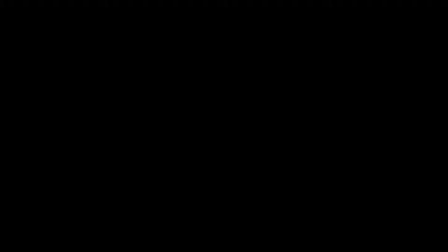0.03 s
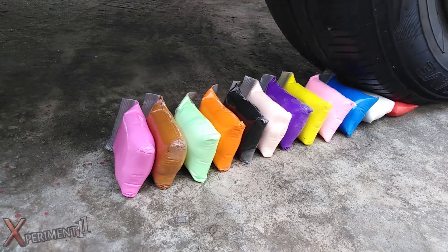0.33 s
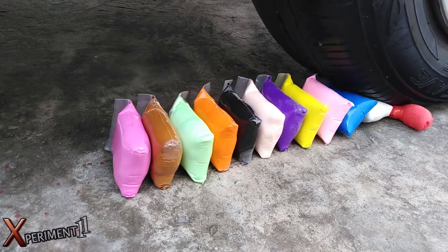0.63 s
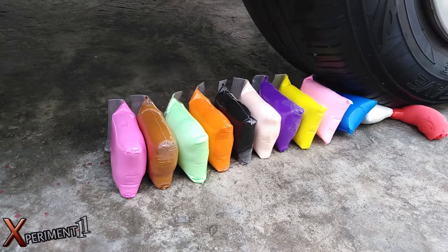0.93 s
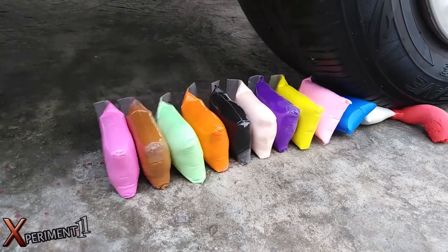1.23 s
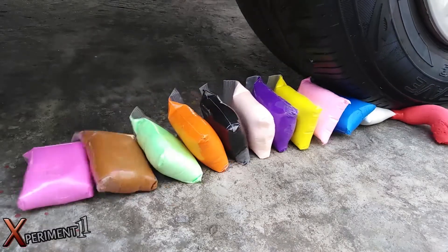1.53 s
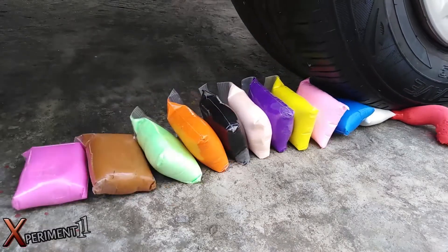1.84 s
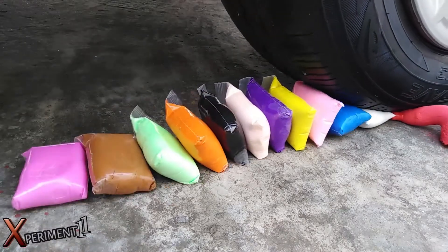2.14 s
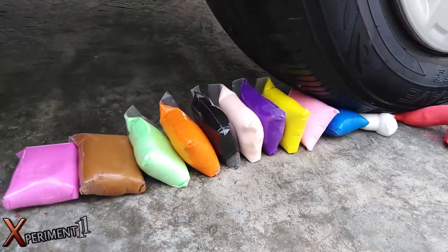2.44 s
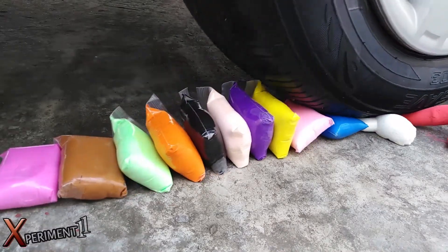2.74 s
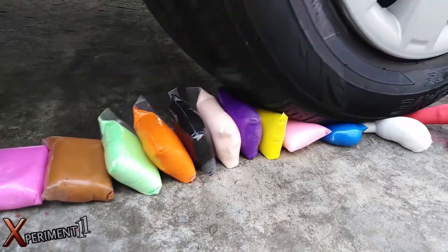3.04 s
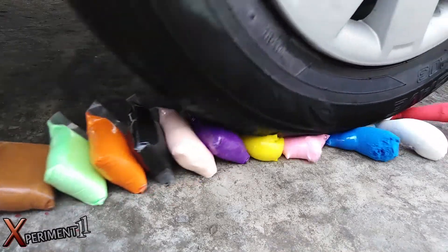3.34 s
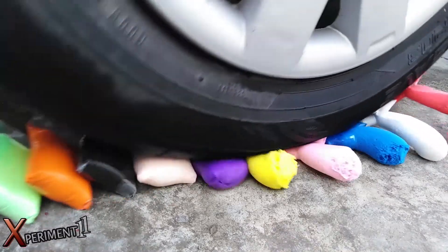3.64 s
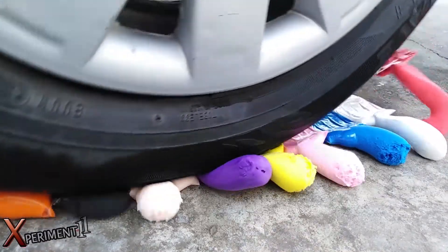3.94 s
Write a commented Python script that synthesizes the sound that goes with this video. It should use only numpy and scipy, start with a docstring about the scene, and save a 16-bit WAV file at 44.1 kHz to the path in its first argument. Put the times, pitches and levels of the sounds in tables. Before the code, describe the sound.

Plastic sachets burst with sharp cracks under a car tyre. Two single pops come as the engine revs up twice, then a quick, loud run of bursts follows, with rumble and grit crackling on concrete close to the microphone.

```python
"""A short scrape over an idling engine, then a rev and a sharp crack: a car is creeping over a row of
paste-filled plastic sachets on concrete. Each sachet bursts and rattles between ground and wheel arch,
the loudest cracks overloading the microphone. The engine is revved up and let down twice; it throbs and
hisses, growing louder as the wheel comes close and grit crackles under the tread. Faint, thin tones
flicker and fade in the quiet stretches, and the level dips briefly before the last run of bursts."""
import sys
import numpy as np
from scipy import signal
from scipy.fft import rfft, irfft
from scipy.io import wavfile

SR = 44100
rng = np.random.default_rng(int(sys.argv[2]) if len(sys.argv) > 2 else 0)


def file_out(sig):
    """Save sig as 16-bit WAV at sys.argv[1]."""
    # one column per channel
    cols = np.atleast_2d(sig).T
    # limit, then scale
    lim = np.clip(cols, -1, 1)
    pcm = np.round(lim * 32767).astype(np.int16)
    wavfile.write(sys.argv[1], SR, pcm)


N = 176400
TIME = np.arange(N) / SR
BAY_LAG_MS = .43  # the engine bay's sound reaches the left microphone port this late


# burst cues: (time [s], crack level [dB], crack t60 [s], film centre [Hz], film level [dB],
# echo level [dB], low-mid EQ [dB], mid EQ [dB], treble EQ [dB], left lag [ms])
BURST_CUES = [(0.5409, -6.5, 0.011, 1480, -10.5, -16, 4, 3.5, 2.5, 0.12),
              (2.3437, -8.5, 0.008, 5100, -8.5, -15.5, 5, -6, 2, 0.19),
              (3.1007, -8.5, 0.012, 2430, -6, -14, -3, 10, 2, 0.16),
              (3.3493, 1, 0.012, 1400, -4, -18, 5, 5.5, -5, 0.093),
              (3.4661, 8.5, 0.014, 2000, 1, -7.5, -1, 5, -4.5, 0.19),
              (3.6536, 7, 0.016, 3060, -3.5, -11.5, 1.5, 5, 3, 0.13),
              (3.8657, 2.5, 0.017, 1800, 4.5, -9.5, 6, 6, -10.5, 0.24),
              (3.9623, -22, 0.0059, 3500, -17, -23.5, 5, 3, 1, 0.075),
              (3.9650, -1, 0.0091, 2370, -11, -23.5, -0.5, -7.5, 8, 0.083),
              (3.9841, -11, .012, 2200, -8, -23.5, 0, 6, -3.5, 0.32)]
# low-mid, mid and treble bands of each burst's EQ: (centre [Hz])
BURST_BANDS = [940, 2540, 5600]
# tone of the crack: (frequency [Hz], level [dB])
CRACK_EQ = [(60, -27), (200, -1.5), (380, -36), (540, -8.5), (760, 1.5), (1000, 1.5), (1600, 4.5),
            (2600, 2), (4000, 0.5), (5800, 4.5), (9000, -12), (13000, -11.5), (16000, -34)]
# tone of the bright first instant: (frequency [Hz], level [dB])
SNAP_EQ = [(1000, -48), (5000, -23), (8000, 37), (10000, -25), (13000, 10), (14500, -11), (16000, -37)]
# tone of the echoes under the car: (frequency [Hz], level [dB])
ECHO_EQ = [(60, -28), (200, -14.5), (400, -5), (600, -4), (800, -2), (1400, -6.5), (2500, 1), (4000, -4),
           (5800, -4), (7500, -17), (10500, -23), (13500, -43), (16000, -44)]
def sachet_bursts(size=16384, lead=256):
    """A sachet tears and lets go: pressure front, snap, crack, flapping film, echoes under the car."""
    out = np.zeros((2, N))
    t, hz = (np.arange(size) - lead) / SR, np.fft.rfftfreq(size, 1 / SR)
    tear = from_db(-5) * (t < 0) * np.exp(-abs(t) / 0.0003)  # the film tears just before it gives way
    after_rush = np.maximum(t - 0.0011, 0)  # air rushes out for 1.1 ms before the crack dies away
    snap_shape = from_db(-26) * (t >= 0) * np.exp(-(t / 0.00093) ** 2)
    echo_shape = decay(t, t60=0.1) * (1 - np.exp(-abs(t) / 0.00083))
    for s, crack_db, crack_t60, film_hz, film_db, echo_db, *band_db, lag_ms in BURST_CUES:
        tone = eq_gain(list(zip(BURST_BANDS, band_db)), hz)
        crack = spread(lambda: irfft(rfft(noise(CRACK_EQ, size)) * tone), lag_ms, direct=0.76)
        crack *= (t >= 0) * decay(after_rush, crack_t60) + tear
        snap = spread(lambda: noise(SNAP_EQ, size), lag_ms, direct=0.39) * snap_shape
        attack = crack + snap + ports(pressure_front(t), lag_ms)
        film_eq = [(film_hz * 2.0 ** octave, -33 * abs(octave)) for octave in (-3, 0, 3)]
        film = spread(lambda: noise(film_eq, size), lag_ms, direct=0.69) * decay(t, t60=0.021)
        scatter = spread(lambda: irfft(rfft(noise(ECHO_EQ, size)) * tone), lag_ms, direct=0.36)
        echo = scatter * echo_shape + wheel_hollow(t)
        burst = from_db(crack_db) * attack + from_db(film_db) * film + from_db(echo_db) * echo
        start = int(s * SR) - lead
        out[:, start:start + size] += colour_ports(burst)[:, :N - start]
    return out


def pressure_front(t, half_s=0.000184):
    """The leading edge of a burst: one sharp swing of pressure and back."""
    return from_db(2) * (t / half_s - 1) * (t >= 0) * (t < 2 * half_s)


# modes of the hollow under the wheel: (frequency [Hz], level against the echoes [dB], t60 [s])
HOLLOW_MODES = [(435, -11.5, 0.064), (665, -30, 0.037), (852, -3, 0.048), (853, -19, 0.051),
                (1077, -9, 0.062), (1297, -13.5, 0.14), (1563, -5.5, 0.091), (1900, -16.5, 0.1034),
                (2290, -18, 0.042), (2550, -13.5, 0.045), (3520, -20, 0.07), (3950, -12.5, 0.094),
                (4470, -7, 0.055)]
def wheel_hollow(t):
    """The space under the wheel rings, a little differently for each burst and port."""
    out = 0
    for hz, db, t60 in HOLLOW_MODES:
        gain = from_db(db + rng.normal(0, 2, (2, 1)))
        out += gain * np.sin(2 * np.pi * (hz * t + rng.random((2, 1)))) * decay(t, t60)
    return out


# stereo tilt of the bursts: (frequency [Hz], left minus right [dB])
PORT_TILT = [(600, -3.5), (1400, -1), (2700, -3), (5000, 1.5), (9000, 5), (14000, -7)]
def colour_ports(x):
    """Each microphone port favours its own bands."""
    size = x.shape[1]
    tilt_db = at_hz(PORT_TILT, np.fft.rfftfreq(size, 1 / SR))
    return irfft(rfft(x) * from_db([tilt_db / 2, -tilt_db / 2]), size)


# air puff cues: (time [s], level [dB], pitch [Hz], t60 [s])
PUFF_CUES = [(3.345, -13.5, 130, 0.039), (3.646, -1.5, 86.5, 0.093), (3.656, -15, 41.7, 0.15),
             (3.9625, -1.5, 800, 0.0068)]
def air_puffs():
    """Air escaping from a sachet gives the microphone a short push."""
    pushes = sum(from_db(db) * np.sin(2 * np.pi * hz * (TIME - s)) * decay(TIME - s, t60)
                 for s, db, hz, t60 in PUFF_CUES)
    return ports(pushes, lag_ms=0.35)


# crinkle cues: (time [s], level [dB], half-width [s])
CRINKLE_CUES = [(0.637, -40, 0.0093), (2.247, -33.5, 0.0027), (2.266, -37, 0.0045), (3.067, -38, .003),
                (3.578, -38, 0.0037), (3.712, -36, 0.018), (3.793, -36, .004)]
# tone of the crinkles: (frequency [Hz], level [dB])
CRINKLE_EQ = [(1000, -27), (3000, -21), (5500, 5.5), (7500, -7), (10000, -9.5), (14000, -15), (16000, -46)]
def film_crinkles():
    """Squeezed film crinkles and paste spits in brief, grainy rustles."""
    envelope = sum(from_db(db) * swell(s, width) for s, db, width in CRINKLE_CUES)
    rustle = spread(lambda: noise(CRINKLE_EQ), lag_ms=0.11, direct=0.43)
    grain = from_db(5.2 * drift(580))
    return envelope * unit_rms(rustle * grain)


# the two revs: (time [s], firing rate [Hz])
REV_CURVE = [(0, 23.7), (.48, 25.03), (.7, 42.1), (.85, 52.64), (1.0, 59.66), (1.2, 62.9), (1.3, 62.3),
             (1.42, 57.8), (1.6, 52.2), (1.84, 40.74), (2.05, 33.55), (2.2, 33), (2.36, 44.07),
             (2.62, 59.7), (3.0, 73.23), (3.13, 75.65), (3.23, 73.37), (3.4, 65.67), (3.57, 56.01),
             (3.8, 42.81), (4, 34.8)]
def engine():
    """Throb, rumble and growl from below the car; hiss and ringing panels from the bay."""
    firing_hz = in_time(REV_CURVE)
    firings = np.cumsum(firing_hz * (1 + 0.00376 * drift(11.4))) / SR
    body = body_rumble()
    bay = engine_bay(firings) * from_db([[-.7], [.7]])  # leans right
    low_end = (exhaust(firing_hz, firings) + body) * from_db([[-1.1], [1.1]])  # leans further right
    return low_end + engine_growl() + bay


# fader ride of the exhaust throb: (time [s], level [dB])
THROB_RIDE = [(.1, -62), (.4, -82), (.55, -40), (.75, -40), (1.05, -47.5), (1.3, -37), (1.58, -31),
              (1.85, -40), (2.1, -58), (2.3, -37.5), (2.55, -32.5), (2.95, -35.5), (3.15, -26.5),
              (3.3, -20), (3.48, -21), (3.62, -19.5), (3.78, -24.5), (4, -31.5)]
# resonances of the exhaust: (frequency [Hz], gain [dB])
EXHAUST_EQ = [(35, -13), (55, -25), (70, 2.5), (88, -4.5), (108, 0), (122, -3), (138, -2.5), (152, 1.5),
              (170, 2), (190, 1.5), (215, 5.5), (232, -2.5), (252, 1), (290, -20), (335, -14.5), (390, -18),
              (465, -15.5), (560, -18.5), (750, -9)]
def exhaust(firing_hz, firings, roughness=0.5, rolloff_db=-0.88):
    """Four-cylinder orders slide through fixed resonances; unequal cylinders add lines in between."""
    throb = 0
    for k in range(2, 48):
        multiple = k / 4  # of the firing rate
        order_db = 0 if k % 4 == 0 else -8 if k % 2 == 0 else -12
        gain = from_db(order_db + rolloff_db * multiple) * eq_gain(EXHAUST_EQ, multiple * firing_hz)
        flutter = 1 + roughness * drift(21.8)
        throb += gain * flutter * np.sin(2 * np.pi * (multiple * firings + rng.random()))
    return ports(unit_rms(throb) * from_db(in_time(THROB_RIDE)), lag_ms=0.13)


# fader ride of the rumble: (time [s], level [dB])
RUMBLE_RIDE = [(.1, -44), (.38, -42), (.52, -32), (.66, -32), (.8, -36.5), (1.1, -44), (1.55, -42),
               (1.85, -40.5), (2.17, -39), (2.28, -31), (2.55, -48), (2.95, -52), (3.12, -25.5), (3.3, -42),
               (3.5, -36.5), (3.66, -27.5), (3.8, -25), (4, -31.5)]
# tone of the rumble: (frequency [Hz], level [dB])
RUMBLE_EQ = [(20, -17), (48, -35), (58, -6), (69, 5.5), (85, -4), (135, 0.5), (180, -6.5), (235, -18),
             (290, -44), (450, -35.5), (700, -64), (1500, -48)]
def body_rumble(drone_hz=69.6, waver_hz=18):
    """Low noise swells below the car while its body drones on one wavering note."""
    rumble = spread(lambda: noise(RUMBLE_EQ), lag_ms=.3, direct=1.0) * from_db(in_time(RUMBLE_RIDE))
    drone = from_db(-42.5) * np.sin(2 * np.pi * drone_hz * TIME + 0.31 * drift(waver_hz))
    return rumble + drone * (1 + 1.1 * drift(waver_hz))


# fader ride of the bay's hiss: (time [s], level [dB])
HISS_RIDE = [(.1, -58), (.35, -74), (.44, -54), (.51, -47.5), (.57, -34.5), (.65, -36), (.76, -44.5),
             (1.0, -40.5), (1.25, -40.5), (1.55, -42.5), (1.95, -47), (2.2, -47), (2.32, -41),
             (2.42, -36.5), (2.6, -38.5), (2.97, -37), (3.12, -29.5), (3.3, -27), (3.6, -31.5), (3.8, -34),
             (4, -38)]
# tone of the hiss, shared by the background: (frequency [Hz], level [dB])
HISS_EQ = [(150, 4), (280, -1.5), (370, -1.5), (460, 2.5), (650, -4.5), (1000, 0), (2200, -1.5), (2900, -4),
           (4500, -4.5), (6500, -6.5), (8200, -11.5), (11000, -23), (13900, -14), (14500, -34),
           (15000, -57), (16000, -70)]
# ringing panels: (frequency [Hz], width [Hz], level against the hiss [dB])
PANEL_MODES = [(1325, 74, -9.5), (1882, 50, -10.5), (2200, 81, -13), (2396, 17, -18.5), (2940, 40, -20.5),
               (3500, 120, -17), (4190, 100, -20), (5440, 160, -15.5)]
def engine_bay(firings, pivot_db=-30):
    """The bay's hiss pulses with each firing, and its panels ring louder as the hiss rises."""
    ride_db = in_time(HISS_RIDE)
    hiss = spread(lambda: noise(HISS_EQ), BAY_LAG_MS, direct=0.097)
    flutter_db = 1.05 * np.sin(2 * np.pi * firings) + 0.53 * drift(55)
    panels = spread(lambda: resonances(PANEL_MODES), BAY_LAG_MS, direct=0.65)
    panel_db = pivot_db + 1.014 * (ride_db - pivot_db)
    return hiss * from_db(ride_db + flutter_db) + panels * from_db(panel_db)


# fader ride of the growl: (time [s], level [dB])
GROWL_RIDE = [(.1, -64), (.7, -62), (.95, -50), (1.35, -46.5), (1.7, -54.5), (2.0, -84), (2.3, -70),
              (2.42, -44.5), (2.7, -46.5), (3.0, -42.5), (3.3, -40), (3.6, -37.5), (4, -41)]
# resonances of the growl: (frequency [Hz], width [Hz], level against the ride [dB])
GROWL_PEAKS = [(334, 20, -4.5), (456, 9.8, -5), (593, 47, -11.5), (784, 49, -7.5), (844, 26, -10.5)]
def engine_growl():
    """Low-mid resonances of the engine swell with each rev."""
    growl = spread(lambda: resonances(GROWL_PEAKS), lag_ms=0.25, direct=0.56)
    return growl * from_db(in_time(GROWL_RIDE))


# judder cues: (time [s], level [dB], pitch [Hz], half-width [s])
JUDDER_CUES = [(.508, -21.5, 89, 0.021), (.62, -25.5, 87, 0.032), (1.53, -34, 217.4, 0.049),
               (2.285, -23, 134, 0.017), (2.4, -22, 142, 0.0075), (3.29, -22, 218, 0.052),
               (3.305, -19.5, 136, 0.042), (3.6, -23, 163.3, .035)]
def tyre_judders():
    """The tyre gives a low judder as it loads a sachet."""
    judders = sum(from_db(db) * np.sin(2 * np.pi * hz * (TIME - s)) * swell(s, width)
                  for s, db, hz, width in JUDDER_CUES)
    return ports(judders, lag_ms=.1)


# tone of the grit: (frequency [Hz], level [dB])
GRIT_EQ = [(500, -23), (1500, -9), (2600, -3), (5500, 9), (8000, -10), (14000, -20), (16000, -50)]
def grit(grains_per_s=230, closest_s=3.32):
    """Grit and folded film crackle under the tread as it comes close."""
    size_db = np.minimum(rng.exponential(1, N), 4)
    clicks = from_db(size_db) * rng.choice([-1, 1], N) * (rng.random(N) < grains_per_s / SR)
    crackle = unit_rms(equalise(clicks, GRIT_EQ))
    return ports(crackle * from_db(-40) * swell(closest_s, width_s=.4), lag_ms=0.24)


# opening scrape and fading tones: (time [s], level [dB], pitch [Hz], width [Hz], t60 [s])
FADING_TONE_CUES = [(0.094, -48, 2080, 157.4, 0.52), (0.087, -64, 2200, 270, 0.27),
                    (.158, -55.5, 1340, 40, 0.13), (0.198, -49, 790, 36.7, 0.21),
                    (0.26, -60, 1900, 40, 0.38), (.425, -55, 4205, 25, .9), (.33, -57.5, 1900, 30.7, 0.18),
                    (.465, -53, 890, 35, .15), (.505, -56, 1470, 60, 0.26), (2.121, -52, 1390, 45, 0.32),
                    (2.215, -45, 1383, 45, .5)]
def fading_tones():
    """After a short opening scrape, faint, thin tones flicker and fade in the quiet stretches."""
    tones = sum(from_db(db) * resonant_noise(hz, width_hz) * decay(TIME - s, t60)
                for s, db, hz, width_hz, t60 in FADING_TONE_CUES)
    return ports(tones, lag_ms=.1)


# thin background tones: (frequency [Hz], width [Hz], level [dB])
THIN_TONES = [(416, 36, -61.5), (1360, 53, -70.5), (1900, 13, -68), (4200, 25, -71), (5700, 40, -72),
              (7280, 29, -77), (9100, 45, -83)]
def background_tones():
    """Faint, thin tones at fixed pitches come and go in the background."""
    return spread(lambda: resonances(THIN_TONES), BAY_LAG_MS, direct=0.66)


def background_hiss():
    """An even bed of hiss under everything."""
    return from_db(-49) * spread(lambda: noise(HISS_EQ), BAY_LAG_MS, direct=0.5)


def from_db(db):
    """Decibels to gain."""
    return 10 ** (np.asarray(db) / 20)


def unit_rms(x):
    """Scale to unit rms."""
    return x / np.sqrt(np.mean(x ** 2) + 1e-20)


def in_time(rows):
    """An automation curve read at every sample."""
    return np.interp(TIME, *np.transpose(rows))


def at_hz(eq, hz):
    """An EQ curve in dB, read on a log-frequency axis."""
    points_hz, db = np.transpose(eq)
    return np.interp(np.log(hz + 1e-9), np.log(points_hz), db)


def eq_gain(eq, hz):
    """An EQ curve as gain."""
    return from_db(at_hz(eq, hz))


def equalise(x, eq):
    """Filter a mono sound through an EQ curve."""
    return irfft(rfft(x) * eq_gain(eq, np.fft.rfftfreq(len(x), 1 / SR)), len(x))


def noise(eq, size=N):
    """Coloured noise of unit rms."""
    return unit_rms(equalise(rng.standard_normal(size), eq))


def drift(rate_hz):
    """A random wobble of unit rms, mostly slower than rate_hz."""
    rolloff = (1 + (np.fft.rfftfreq(N, 1 / SR) / rate_hz) ** 2) ** 2
    return unit_rms(irfft(rfft(rng.standard_normal(N)) / rolloff, N))


def resonant_noise(hz, width_hz):
    """Noise in one steep-sided resonance, unit rms."""
    shape = 1 / (1 + ((np.fft.rfftfreq(N, 1 / SR) - hz) / width_hz) ** 2)
    return unit_rms(irfft(rfft(rng.standard_normal(N)) * shape, N))


def resonances(rows, waver_db=3.0):
    """Noise ringing in a set of resonances, each wavering in strength."""
    return sum(from_db(db + waver_db * drift(8.7)) * resonant_noise(hz, width) for hz, width, db in rows)


def decay(t, t60):
    """Exponential decay from time zero."""
    return (t >= 0) * np.exp(-np.log(1000) * np.maximum(t, 0) / t60)


def swell(peak_s, width_s):
    """A bell-shaped fade in and out."""
    return np.exp(-((TIME - peak_s) / width_s) ** 2)


def ports(x, lag_ms):
    """A sound reaches the right microphone port first, the left one later."""
    n = np.arange(len(x))
    return np.array([np.interp(n - np.round(lag_ms * SR / 1000), n, x, left=0), x])


def spread(make, lag_ms, direct):
    """Stereo from a direct share of the power and scattered sound that differs at each port."""
    return np.sqrt(direct) * ports(make(), lag_ms) + np.sqrt(1 - direct) * np.array([make(), make()])


def scene():
    """The sachets and the car that crushes them, over thin tones and a background hiss."""
    bed = background_hiss()
    car = engine() + tyre_judders()
    tones = background_tones() + fading_tones()
    return sachet_bursts() + air_puffs() + film_crinkles() + car + grit() + tones + bed


def suppress_noise(x, size=1024, memory_s=0.028, depth_db=-25.5, steepness=3.14):
    """Narrow bands shut as they sink to the hiss; quiet stretches break into thin, flickering tones."""
    hz, _, spectra = signal.stft(x, SR, nperseg=size)
    hiss_power = eq_gain(HISS_EQ, hz) ** 2
    threshold = .75 * from_db(-45) ** 2 * hiss_power / hiss_power.sum()  # a band is half open here
    keep = np.exp(-size / 2 / SR / memory_s)
    power = np.mean(abs(spectra) ** 2, axis=0)
    over_threshold = signal.lfilter([1 - keep], [1, -keep], power) / threshold[:, None]
    gain = 1 - (1 - from_db(depth_db)) / (1 + over_threshold ** steepness)
    return signal.istft(spectra * gain, SR, nperseg=size)[1][:, :N]


def record(dry, gain=.78, knee=.78, start_s=0.103, dip_s=2.82):
    """Low cut, microphone overload, noise suppressor, an abrupt start, one level dip and a high cut."""
    low_cut = signal.butter(2, 53, "high", fs=SR, output="sos")
    high_cut = signal.ellip(8, .3, 80, 14900, fs=SR, output="sos")
    trimmed = signal.sosfilt(low_cut, dry)
    clipped = gain * trimmed / (1 + (trimmed / knee) ** 4) ** (1 / 4)
    fall, rise = (dip_s - TIME) / 0.27, (TIME - dip_s) / 0.12
    dip = np.clip(np.maximum(fall, rise), from_db(-41), 1)
    cut_in = np.clip((TIME - start_s) / 0.00032, 0, 1)
    return signal.sosfilt(high_cut, suppress_noise(clipped) * dip * cut_in + 1e-18)


dry = scene()
out = record(dry)
file_out(out)
```